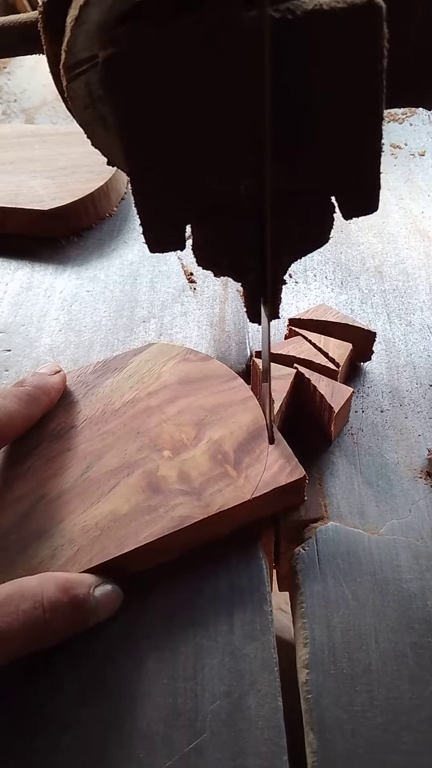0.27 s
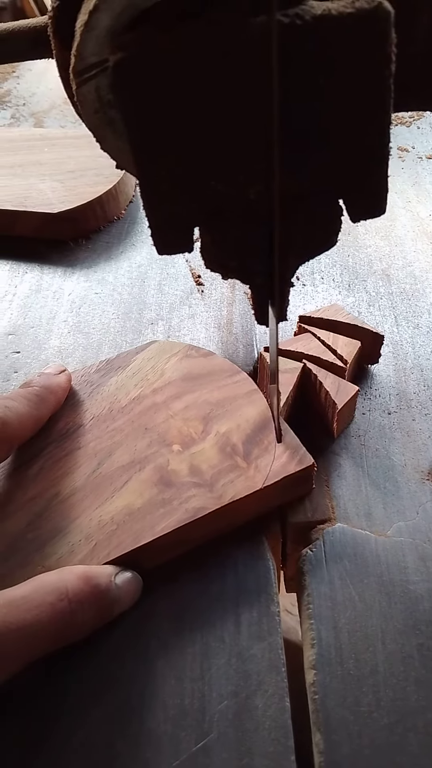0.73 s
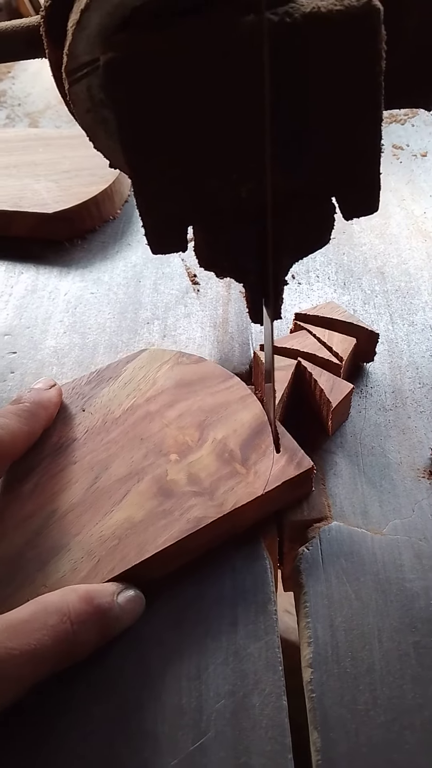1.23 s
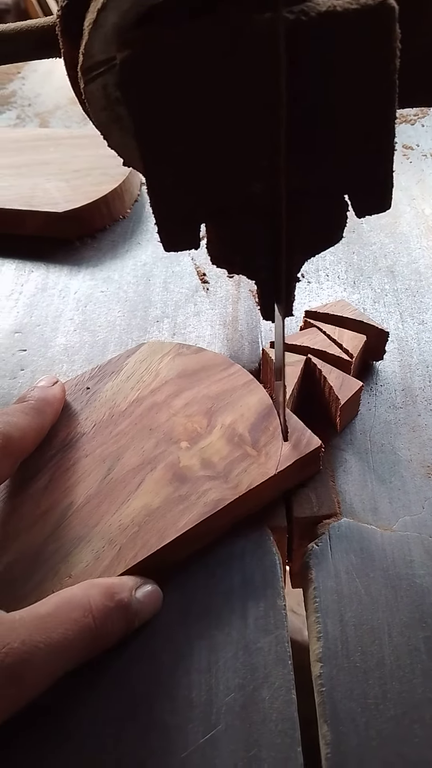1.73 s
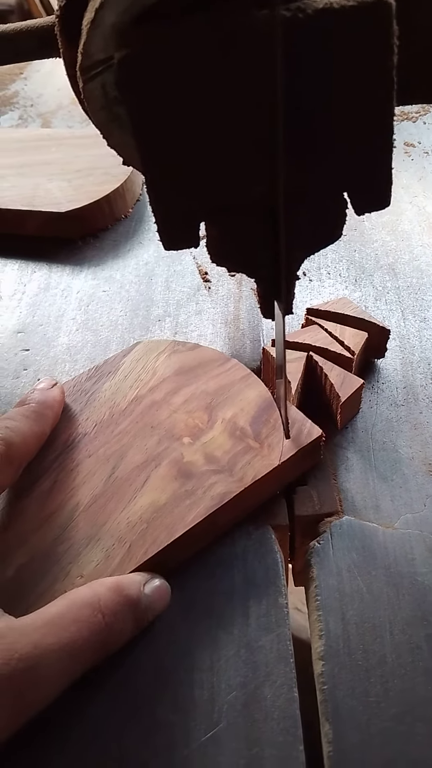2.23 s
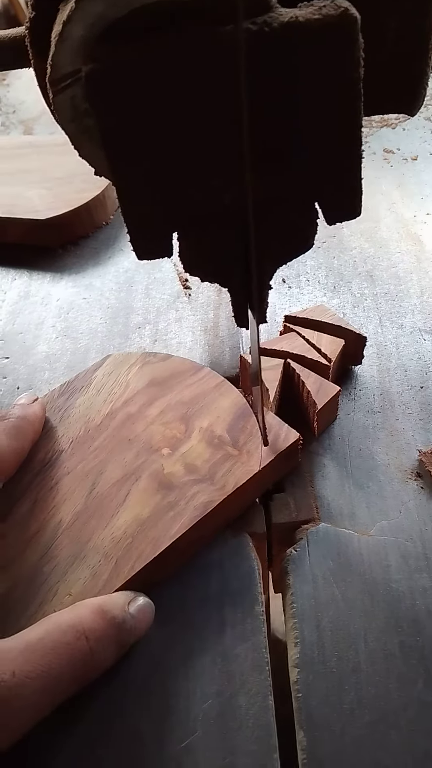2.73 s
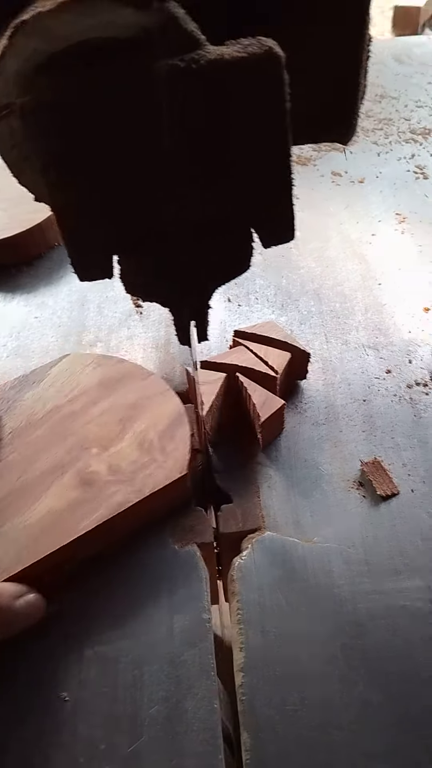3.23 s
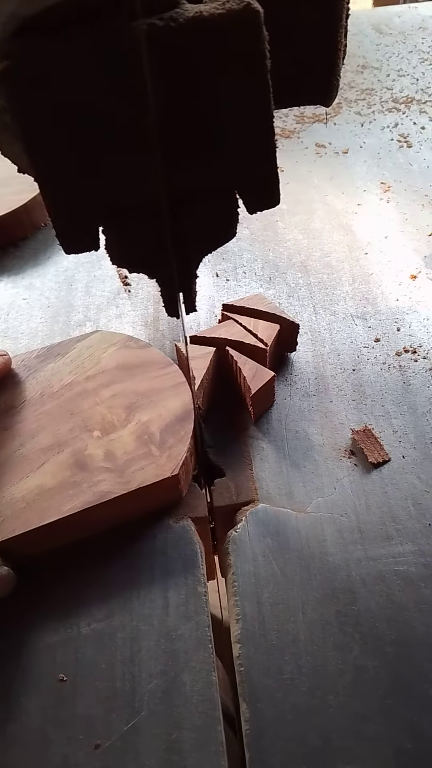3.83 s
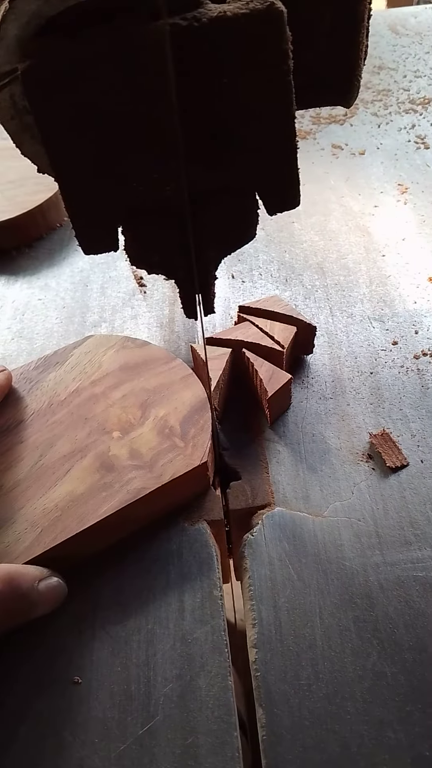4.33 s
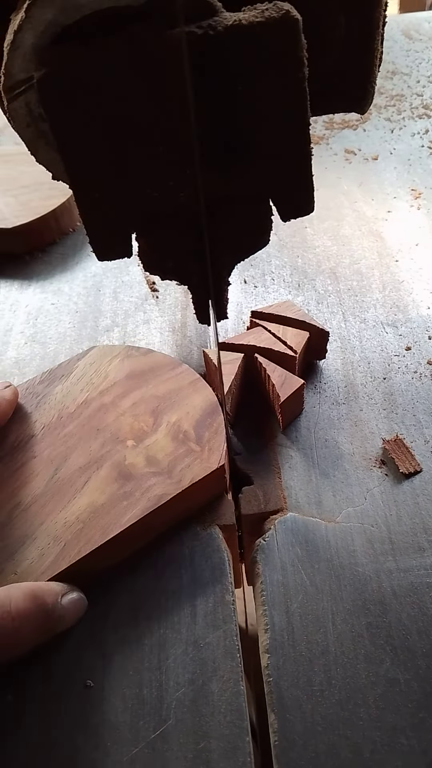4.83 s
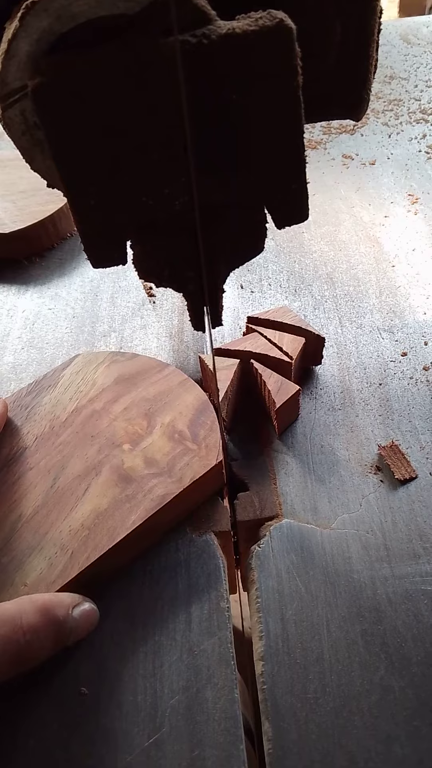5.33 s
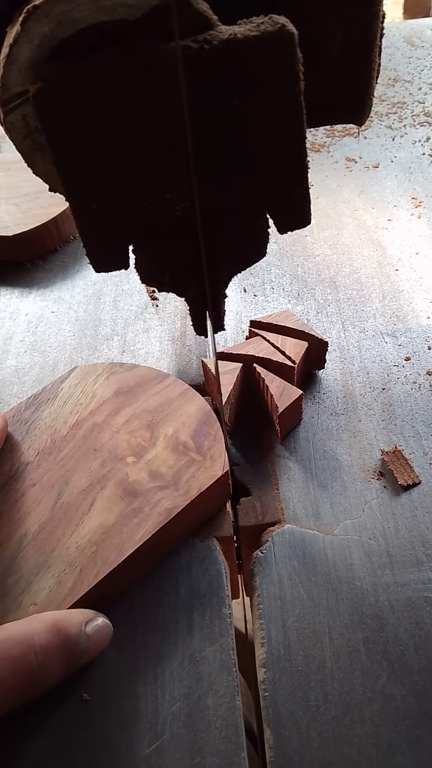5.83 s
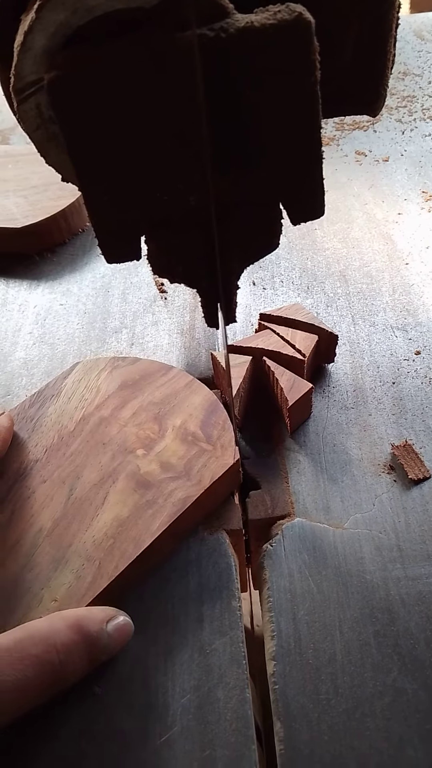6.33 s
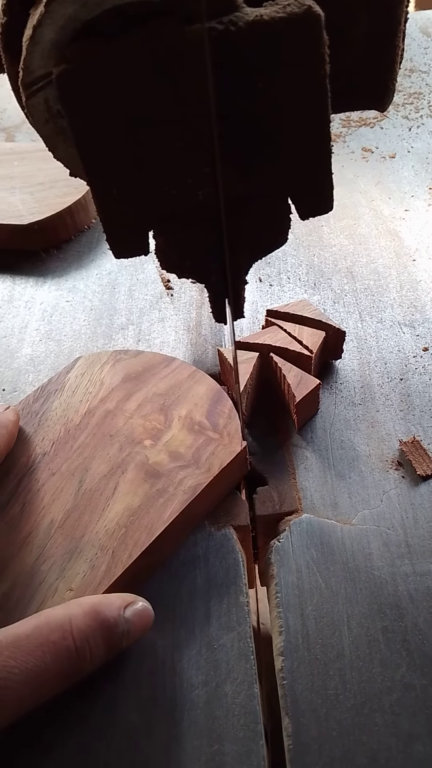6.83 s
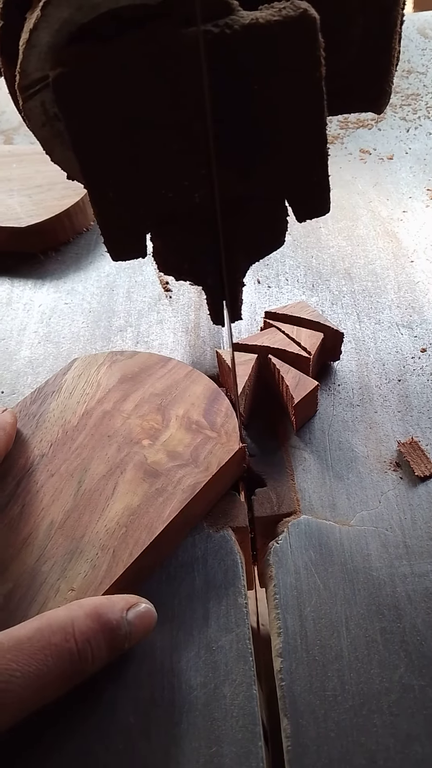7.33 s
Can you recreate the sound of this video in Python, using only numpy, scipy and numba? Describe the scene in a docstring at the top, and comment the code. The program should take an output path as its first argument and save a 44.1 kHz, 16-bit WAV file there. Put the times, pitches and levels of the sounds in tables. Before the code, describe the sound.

A running band saw is heard very near, dense and noisy, with no silence. First come scratchy wood cutting, small tooth catches and repeated thin squeals, strongest shortly before three seconds. The bite then slackens, leaving more machine roar and low rumble, before a steadier, hissing cut resumes. Soft low knocks of wood on the table appear now and then until the end.

```python
"""A band saw cuts a hardwood block close to a microphone: torn fibres, as noise, excite resonators of blade and block.
At first the teeth rasp and the binding blade squeals, a frequency-modulated tone in narrow-band noise, until 3.1 s.
Near 3.2 s the cutting weakens and a low rumble rises under the machine's roar, which is noise with a shaped spectrum.
From 3.7 s the cut gains again with hardly a squeal; from 2.7 s on dull knocks, decaying sines, come now and then.
Throughout, each turn of the wheel and each loop of the blade repeat a pattern of louder and softer moments."""
import sys
import numpy as np
from scipy.fft import rfft, irfft, next_fast_len
from scipy.io import wavfile
from scipy.ndimage import uniform_filter1d, map_coordinates
from numba import njit

SR = 44100
rng = np.random.default_rng(int(sys.argv[2]) if len(sys.argv) > 2 else 0)


def store_wav(level_fs):
    """Save 16-bit WAV to argv[1]."""
    pcm = np.round(np.clip(np.atleast_2d(level_fs), -1, 1) * 32767)
    wavfile.write(sys.argv[1], SR, pcm.T.astype(np.int16))


N = 334698
TIME = np.arange(N) / SR

# Resonances of blade and kerf, levels counted from the bite before the constant trims in cut():
# [t/s, whine f/Hz, level/dB, kerf f/Hz, level/dB, rasp f/Hz, level/dB, upper rasp f/Hz, level/dB, block level/dB]
KERF_STAGES = [(0, 2300, -0.5, 2560, -1, 3900, -2.5, 5000, -6, -11),
               (0.3, 2270, -3, 2620, -6, 3900, -3.5, 5040, -6.5, -16.5),
               (0.45, 2160, -4, 2600, -7.5, 3960, -1, 5020, -5, -15.5),
               (0.65, 2240, -6.5, 2560, -5, 3940, 0.5, 5120, -8.5, -13),
               (0.9, 2220, -4.5, 2540, -0.5, 3970, -2, 5130, -6.5, -12),
               (1.15, 2120, -4.5, 2730, -4.5, 4010, -1.5, 5030, -3, -18.5),
               (1.35, 2050, -6, 2880, -7, 4040, -0.5, 5050, -7, -14),
               (1.6, 2044, -7, 2700, -4, 3960, -0.5, 5200, -8.5, -14.5),
               (2.05, 1970, -8.5, 2814, -6.5, 3925, -1.5, 5160, -9, -15),
               (2.3, 2240, -5.5, 2887, -8.5, 3690, 1, 5020, -11, -17.5),
               (2.8, 2230, -6, 3000, -5.5, 3730, 1.5, 5000, -11, -15.5),
               (2.97, 2120, 0.5, 2990, -1, 3900, -1, 5050, -5, -12.5),
               (3.14, 2050, -8, 2900, 0, 3700, 0.5, 5030, -10, -17),
               (3.21, 1630, -14, 2810, -6, 3730, -3.5, 5070, -6.5, -22),
               (3.66, 1730, -13, 2720, -5.5, 3800, -7, 5180, -7, -29),
               (3.73, 1750, -10, 2760, -1.5, 3820, -6, 5170, -8, -31),
               (3.9, 1750, -6, 2680, -1.5, 3660, -2.5, 5100, -9.5, -30),
               (4.25, 1780, -10, 2620, -0.5, 3750, -2.5, 5140, -4.5, -28),
               (4.45, 1740, -9, 2640, 2, 3770, -5.5, 5100, -11, -23),
               (4.58, 1776, -13, 2670, -2, 3850, -6, 5020, -3, -25),
               (4.9, 1810, -15, 2690, -2.5, 3870, -5.5, 4930, -5.5, -20),
               (5.8, 1856, -14.5, 2896, -4, 3930, -6, 4910, -5, -21.5),
               (6.6, 1940, -12.5, 2885, -6, 3950, -3, 4930, -6, -17.5),
               (7.59, 1975, -11.5, 2800, -9, 3750, -4, 4870, -6.5, -18.5)]
# How hard the teeth bite: [t/s, level/dB]
BITE_LEVEL = [(0, -25), (0.06, -19.5), (0.4, -19.5), (0.9, -20.5), (1.08, -22.5), (1.3, -20.5), (1.7, -22),
              (1.95, -20), (2.55, -20.5), (3.14, -21.5), (3.2, -25.5), (3.66, -24), (3.74, -21.5),
              (4.5, -22.5), (4.7, -20), (5.4, -20), (6.4, -20), (7.59, -19.5)]
# Brief changes of loudness, mostly dips: [t/s, change of level/dB]
LEVEL_CHANGES = [(0.23, -4), (0.7, -9), (0.96, -7.5), (1.02, -4), (1.14, -1.5), (1.23, -0.5), (1.73, -0.5),
                 (1.8, -3), (1.87, -3), (1.99, -2), (2.35, -4), (3.03, -3.5), (4.21, -1.5), (4.3, -3),
                 (4.951, -4.5), (5.29, -2.5), (5.41, -2), (5.54, -1), (6.48, -5), (6.85, 1.5), (6.97, -2.5),
                 (7.15, -2), (7.39, 0)]
LEVEL_CHANGE_S = 0.011  # standard deviation of each Gaussian change
# A tooth catches: [t/s, level/dB, later set against the bite and lowered 15 dB]
TOOTH_CATCHES = [(0.2698, -6), (0.5289, -7), (0.6891, -4), (0.9892, -6), (1.0485, -6), (1.1123, -6),
                 (1.1662, -6), (1.4875, -6), (1.6476, -6), (1.706, -5), (1.8307, -9), (2.1268, -5),
                 (2.2063, -4), (2.3106, -5), (2.3678, -7), (2.7292, -6), (3.1437, -7), (4.5345, -7),
                 (5.3133, -8), (6.1394, -8), (6.5071, -7), (6.9381, -7)]
# How much the wood damps the blade: [t/s, share]
WOOD_DAMPING = [(0, 0.96), (0.45, 1.03), (0.7, 0.78), (1.1, 0.99), (2.1, 1.02), (2.45, 0.81), (3.15, 0.96),
                (3.22, 0.61), (4.55, 0.65), (4.95, 0.75), (7.59, 1.03)]
# A thin, high ring of the blade: [t/s, f/Hz, level/dB counted from the bite]
BLADE_SHEEN = [(0, 6600, -28), (2.2, 6500, -24), (2.4, 6300, -16), (2.75, 6180, -15), (3.05, 6500, -35),
               (3.12, 7900, -14), (4.5, 7600, -28), (4.9, 7400, -36)]
# Modes of the block: [f/Hz, width/Hz, level/dB]
BLOCK_MODES = [(377, 21, 0), (625, 53, 3), (798, 33, -5), (1151, 61, 4)]
# Spectrum of the dust hiss: [f/Hz, density/dB per Hz]
DUST_SPECTRUM = [(400, -33), (1000, -2.5), (2000, -23), (5000, 2), (5700, -11), (6450, -6), (7400, -7),
                 (8720, -4), (11400, 4), (12800, -2)]
# The steadier sounds: [t/s, dust hiss level/dB counted from the bite, machine level/dB full scale]
STEADY_LEVELS = [(0, -3.5, -27), (1.3, -3, -28.5), (2.3, -5, -28), (3.14, -3, -26.5), (3.22, -1, -27.5),
                 (3.8, -5.5, -27), (4.5, -4.5, -28), (4.7, -4, -26.5), (5.8, -3, -27.5),
                 (7.59, -4.5, -27.5)]
# Uneven places on the wheel: [share of a turn, bump/dB, width as share of a turn]
WHEEL_PLACES = [(.1, -1.4, .05), (.39, 2, .018), (.655, 1.8, .018), (.77, 1.1, .015), (.9, -.8, .03),
                (.97, 1, .015)]
# Uneven places along the blade: [share of a loop, bump/dB, width as share of a loop]
BLADE_PLACES = [(.02, 1, .02), (.35, 0.5, 0.042), (.46, 0, 0.015), (.56, 1, 0.0067), (.615, -0.9, .012),
                (.71, -0.5, 0.005), (.8, 0.5, 0.038)]
TURN_S, LOOP_S = .2394, .7184  # one loop of the blade is three wheel turns
# The blade binds and squeals: [start t/s, hold/s, level/dB, pitch sag/Hz before smoothing]
BINDS = [(0.06, 0.17, -24, 1.9), (0.55, 0.31, -25.5, 1.4), (0.786, 0.15, -21, 6.8), (1.054, .03, -29.5, 1),
         (1.513, 0.043, -24.5, 3), (1.592, 0.14, -25.5, 3.5), (2.11, 0.081, -24.5, 6.5),
         (2.196, 0.075, -20, 10.5), (2.751, .06, -22, 9.8), (2.822, 0.053, -18, 19.6),
         (2.967, 0.016, -23, 14.3), (3.108, 0.017, -32.5, 8.7), (6.556, 0.021, -27, 1)]
RISE_DB_PER_S, FALL_DB_PER_S = 256, 119.5
# The faint note between the binds: [t/s, level/dB]
FAINT_NOTE = [(0, -30.5), (1.75, -36), (1.85, -44), (2.4, -35), (3.12, -43), (3.16, -70), (4.3, -72),
              (4.4, -47), (4.7, -35), (5.9, -35), (6.5, -39.5), (6.65, -36), (7.59, -38.5)]
SQUEAL_HZ, LOUD_SQUEAL_DB = 2453, -19  # the level is where the share of loudness is 1
# Changes while the squeal is loudest, the other sounds dip:
# [whine, kerf, upper rasp, dust, block, machine; each change/dB]
SQUEAL_DIPS = (-1.5, -8, -11, -6, -3.5, -7.5)
NARROWS = 0.14  # share by which the bands of the blade narrow their damping while the squeal is loudest
# Dull knocks, likely the block or an offcut bouncing on the table: [t/s, level/dB, later raised 3 dB, f/Hz]
KNOCKS = [(2.699, -25, 645), (3.416, -26, 323), (3.586, -25, 410), (3.884, -25, 439), (4.472, -27, 388),
          (4.77, -27, 396), (5.948, -26.5, 420), (6.67, -22, 610), (6.758, -22, 365), (6.799, -26, 360),
          (6.936, -25, 383), (7.286, -22, 629), (7.426, -26, 348)]
# Spectrum of the machine's roar: [f/Hz, density/dB per Hz]
ROAR_SPECTRUM = [(20, -25), (36, -18), (60, -28), (80, -29), (98, -11), (141, -13.5), (222, -5.5),
                 (330, -3), (500, -3.5), (700, -7), (1040, -3), (1400, -1), (2200, -5.5), (12800, -14.5)]
# A low rumble: [t/s, level/dB counted from the machine's roar]
RUMBLE_LEVEL = [(0, -35), (3, -35), (3.2, -19.5), (4.2, -20.5), (5.5, -24), (6.5, -26.5), (7.59, -20.5)]
TOP_HZ = 12830  # band limit of the microphone


def cut(push):
    """Forced resonance: tearing fibres excite kerf, blade and block, weighted by the stage of the cut."""
    (whine_hz, whine_db, kerf_hz, kerf_db, rasp_hz, rasp_db,
     upper_hz, upper_db, block_db) = curves(KERF_STAGES)
    dust_db = curves(STEADY_LEVELS)[0]
    grip = curves(WOOD_DAMPING)[0]
    sheen_hz, sheen_db = curves(BLADE_SHEEN)
    squeal_share = binding()[2]
    levels = (whine_db, kerf_db, upper_db, dust_db, block_db)
    whine_db, kerf_db, upper_db, dust_db, block_db = (
        db + change_db * squeal_share for db, change_db in zip(levels, SQUEAL_DIPS))
    tear = push * chips(spread_db=2.5)

    def band(hz, width_hz):
        """Cascaded resonance: two equal passes, with loudness evened out so it does not follow the width."""
        out = ring(ring(tear, hz, width_hz, SR), hz, width_hz, SR)
        return out / np.sqrt(uniform_filter1d(out ** 2, size=SR // 3) + 1e-12)

    damp = np.clip(grip * (1 - NARROWS * squeal_share), .1, 2)
    # neighbouring bands alternate in sign
    blade = amp(whine_db - 2.5) * band(whine_hz, 900 * damp ** 3)
    blade -= amp(kerf_db - 1.0) * band(kerf_hz, 1100 * damp)
    blade += amp(rasp_db - 3.5) * band(rasp_hz, 1100 * damp)
    blade -= amp(upper_db + 2.27) * band(upper_hz, 850 * damp)
    blade += amp(sheen_db) * band(sheen_hz, np.full(N, 1200.))

    def block_response(f):
        """Modal superposition: the block's modes add with alternating sign."""
        return sum((-1) ** k * amp(db) * mode(hz, width_hz)(f)
                   for k, (hz, width_hz, db) in enumerate(BLOCK_MODES))

    block = amp(block_db + 4.5 + 1.5 * wobble(12)) * filtered(tear, block_response)
    dust = amp(dust_db) * filtered(tear, shape(DUST_SPECTRUM))
    return amp(bite()) * (blade + dust + block)


def chips(spread_db):
    """Impulsive excitation: fibres tear in dense cracks of unequal size, with a burst where a tooth catches."""
    tear = unit(rng.standard_normal(N) * amp(spread_db * wobble(1500)))
    bite_db = bite()
    t = np.arange(SR // 30) / SR
    burst = np.ones(N + SR)
    for s, db in TOOTH_CATCHES:
        at = round(s * SR)
        decay = amp(db - bite_db[at] - 15 - 60 * t / .03)  # falls 60 dB in 30 ms
        burst[at:at + len(t)] += decay * (1 - np.exp(-t / .001))
    return tear * burst[:N]


def bite():
    """Excitation strength: level of the cutting in dB from its slow level and brief changes, mostly dips."""
    slow_db = curves(BITE_LEVEL)[0]
    return slow_db + sum(db * np.exp(-.5 * ((TIME - s) / LEVEL_CHANGE_S) ** 2) for s, db in LEVEL_CHANGES)


def surge():
    """Amplitude modulation: gain of the blade's push from the uneven wheel, the uneven blade and chance."""
    chance_db = 0.65 * wobble(30) + 0.86 * wobble(90)
    return amp(chance_db + uneven(WHEEL_PLACES, TURN_S) + uneven(BLADE_PLACES, LOOP_S))


def uneven(places, period_s):
    """Periodic modulation: bumps in dB return every period with slightly varying height."""
    total_db = np.zeros(N)
    for place, db, width in places:
        away = (TIME / period_s - place + .5) % 1 - .5
        total_db += db * (1 + 0.086 * wobble(4.0)) * np.exp(-.5 * (away / width) ** 2)
    return total_db


def squeal(push):
    """Frictional self-oscillation: an unsteady note beats with a weaker one 120 Hz above, in narrow-band noise."""
    level_db, sag_hz, _ = binding()
    hz = SQUEAL_HZ - sag_hz

    def note(hz, stray_hz):
        """Frequency modulation: a sine of rms near 1 whose pitch and level stray at random."""
        phase = 2 * np.pi * np.cumsum(hz + stray_hz * wobble(40)) / SR
        return np.sqrt(2) * np.sin(phase) * amp(1.1 * wobble(30))

    tone = note(hz, 4) + amp(-11) * note(hz + 120, 18)
    haze = filtered(push * chips(spread_db=5.0), mode(2435, 194))
    gain = uniform_filter1d(amp(level_db), size=SR // 100)
    return gain * (tone + amp(-3.5) * haze)


def binding():
    """Exponential growth and decay: squeal level (dB), pitch sag (Hz) and how loud the squeal is (share)."""
    level_db, sag_hz = curves(FAINT_NOTE)[0], np.zeros(N)
    for s, hold, db, hz in BINDS:
        before_s = np.clip(s - TIME, 0, None)
        after_s = np.clip(TIME - s - hold, 0, None)
        here_db = db - RISE_DB_PER_S * before_s - FALL_DB_PER_S * after_s
        sag_hz += hz * amp(here_db - db) * (here_db > level_db - 6)
        level_db = np.maximum(level_db, here_db)
    share = uniform_filter1d(amp(level_db - LOUD_SQUEAL_DB), size=SR // 12)
    return level_db, uniform_filter1d(sag_hz, size=SR // 10), share


def knocks():
    """Damped free vibration: each knock is a few softly started cycles of wood."""
    out = np.zeros(N + SR)
    t = np.arange(SR // 10) / SR
    for s, db, hz in KNOCKS:
        envelope = amp(db + 3.0 - 60 * t / 0.067) * (1 - np.exp(-t / 0.0021))  # falls 60 dB in 67 ms
        at = round(s * SR)
        out[at:at + len(t)] += envelope * np.sin(2 * np.pi * hz * t)
    return out[:N]


def machine(push):
    """Broadband radiation: motor, wheels and guides roar, with the wheel's pattern, dips of the cut and chance."""
    bite_db = bite()
    # quick dips shared with the cutting, and chance
    dip_db = .5 * (bite_db - uniform_filter1d(bite_db, size=SR // 4))
    lumps = amp(dip_db + 1.65 * wobble(15) + 1.1 * wobble(60))
    spectrum = shape(ROAR_SPECTRUM)

    def frame(f):
        """Structural resonance: the cast frame strengthens the roar around one low note."""
        return spectrum(f) * (1 + 0.39 * mode(254, 28)(f))

    roar = filtered(lumps * push ** 0.75 * rng.standard_normal(N), frame)
    rumble = filtered(lumps * rng.standard_normal(N), lambda f: spectrum(f) * (f < 210))
    level_db = curves(STEADY_LEVELS)[1] + SQUEAL_DIPS[-1] * binding()[2]
    return amp(level_db) * (roar + amp(curves(RUMBLE_LEVEL)[0]) * rumble)


@njit
def ring(x, hz, width_hz, sr):
    """Damped oscillator: a two-pole resonance whose centre and width move."""
    y = np.zeros(len(x))
    for i in range(2, len(x)):
        r = np.exp(-np.pi * width_hz[i] / sr)
        drive = (1 - r * r) ** .5 * (x[i] - x[i - 2])
        y[i] = drive + 2 * r * np.cos(2 * np.pi * hz[i] / sr) * y[i - 1] - r * r * y[i - 2]
    return y


def mode(centre_hz, width_hz):
    """Simple resonance: the causal frequency response of one mode, 1 at its centre."""
    return lambda f: 1j * f * width_hz / (centre_hz ** 2 - f * f + 1j * f * width_hz)


def shape(points):
    """Spectral envelope: the gain of (f/Hz, level/dB) points on a log axis."""
    f, db = np.transpose(points)
    return lambda hz: amp(np.interp(np.log(hz + 1), np.log(f + 1), db))


def filtered(x, response):
    """Linear filtering: x times a complex response of frequency, at rms 1."""
    m = next_fast_len(N + SR // 2)
    return unit(irfft(rfft(x, m) * response(np.fft.rfftfreq(m, 1 / SR)), m)[:N])


def wobble(rate):
    """Random modulation: a smooth curve through random knots, rate knots a second."""
    return map_coordinates(rng.standard_normal(int(N * rate / SR) + 4), [TIME * rate])


def curves(rows):
    """Linear interpolation: one value per sample for each column after the time."""
    s, *cols = np.transpose(rows)
    return [np.interp(TIME, s, c) for c in cols]


def unit(x):
    """Normalisation: x scaled to rms 1."""
    return x / np.sqrt(np.mean(x ** 2) + 1e-20)


def amp(db):
    """Logarithmic level: decibels to gain."""
    return 10 ** (np.asarray(db) / 20)


def scene():
    """Superposition: all sources add at one microphone."""
    push = surge()
    return (cut(push) + squeal(push) + knocks() + machine(push))[None]


def record(dry):
    """Saturation and filtering: peaks are rounded, the port dips near 7 kHz, nothing passes the band limit."""
    m = next_fast_len(N + SR // 2)
    hz = np.fft.rfftfreq(m, 1 / SR)
    soft = dry / (1 + np.abs(dry / .66) ** 4) ** (1 / 4)
    response = (1 - 0.5 * mode(7000, 600)(hz)) * (hz < TOP_HZ)
    return irfft(rfft(soft, m) * response, m)[:, :N]


dry = scene()
out = record(dry)
store_wav(out)
```